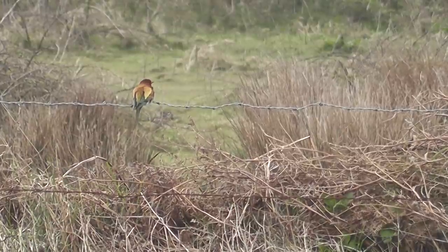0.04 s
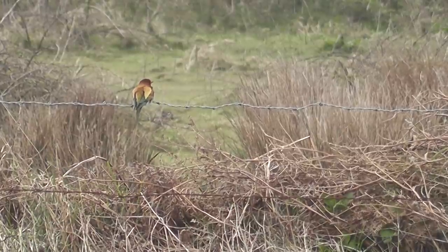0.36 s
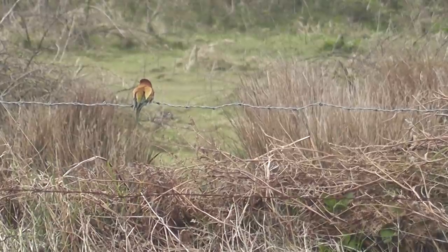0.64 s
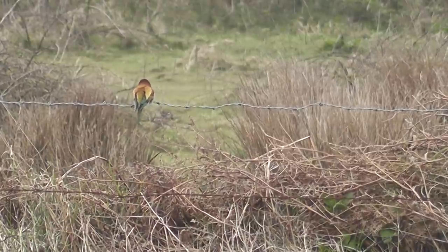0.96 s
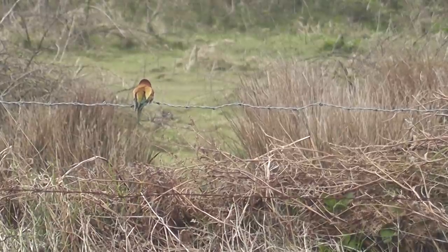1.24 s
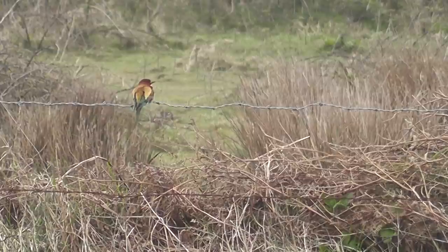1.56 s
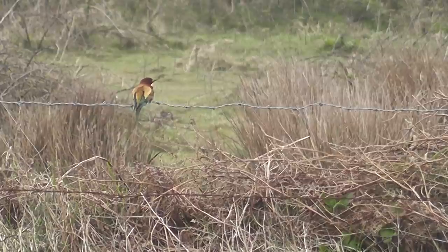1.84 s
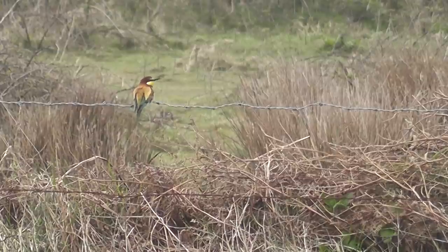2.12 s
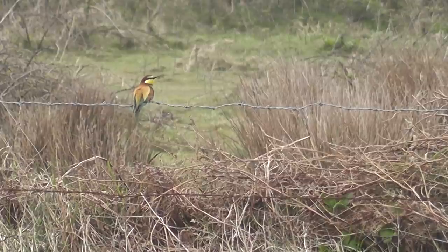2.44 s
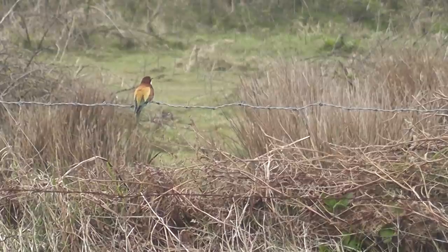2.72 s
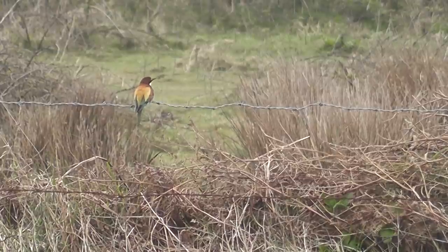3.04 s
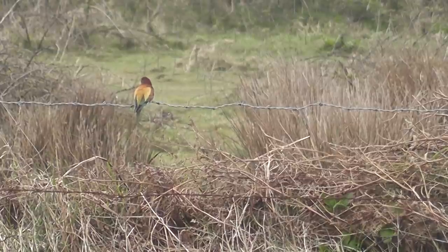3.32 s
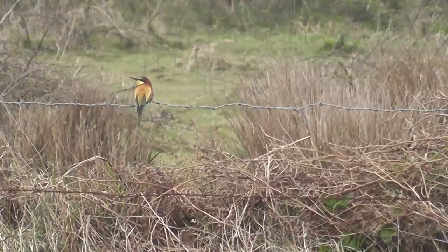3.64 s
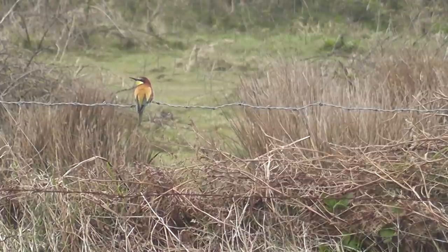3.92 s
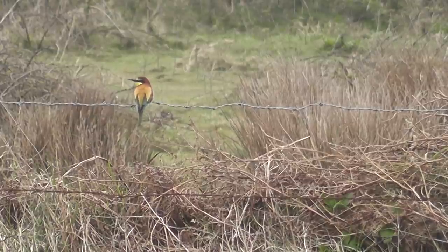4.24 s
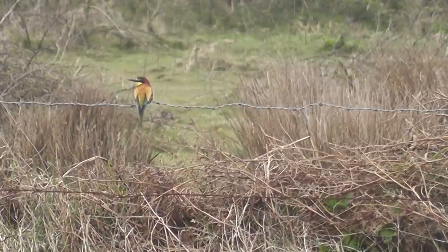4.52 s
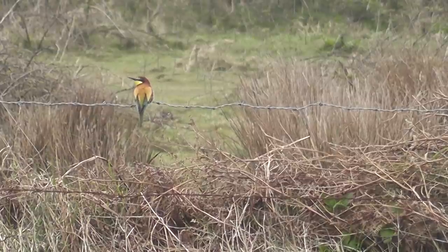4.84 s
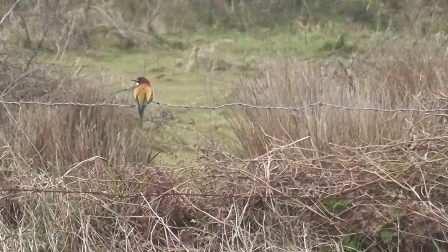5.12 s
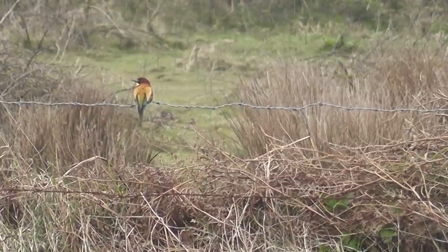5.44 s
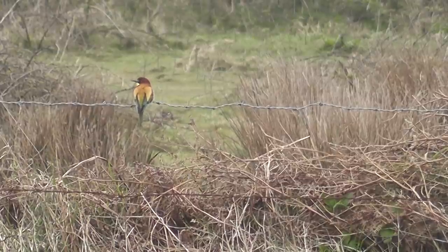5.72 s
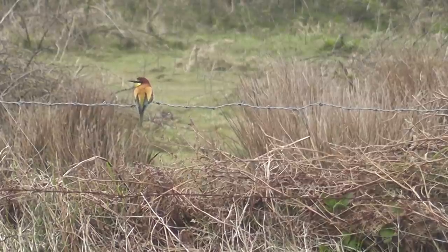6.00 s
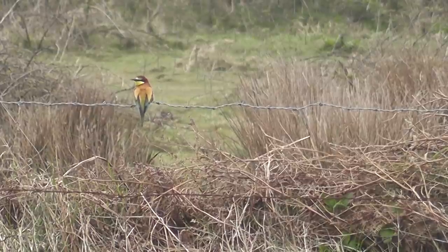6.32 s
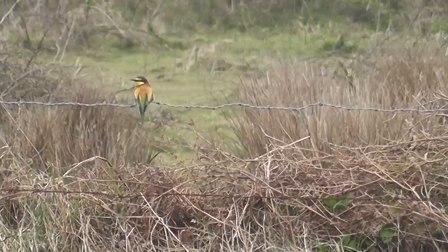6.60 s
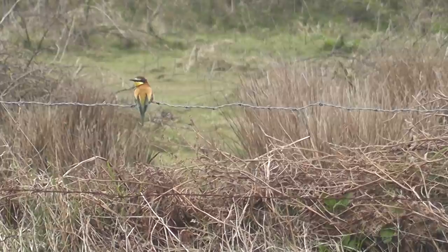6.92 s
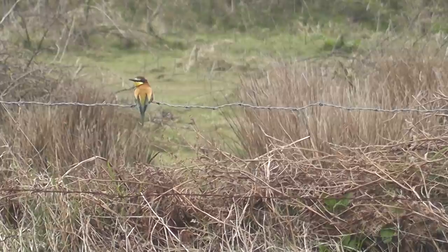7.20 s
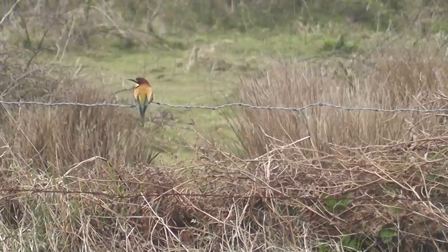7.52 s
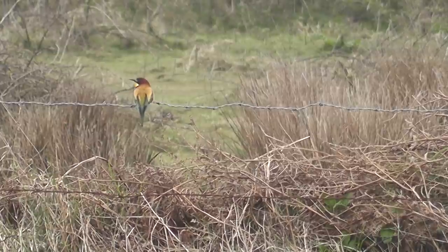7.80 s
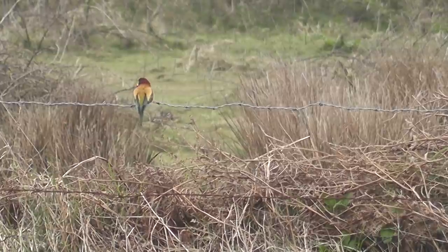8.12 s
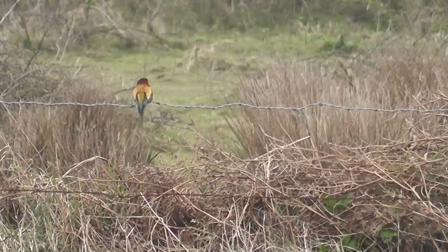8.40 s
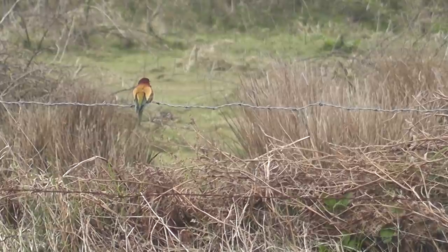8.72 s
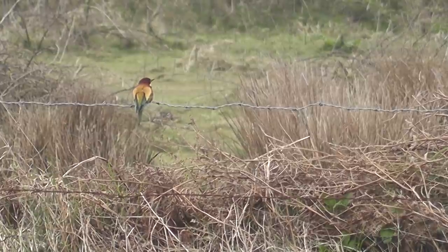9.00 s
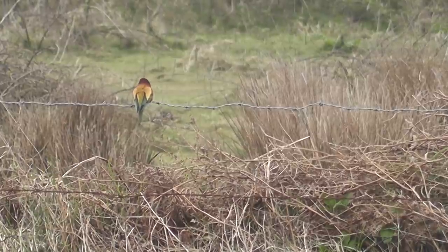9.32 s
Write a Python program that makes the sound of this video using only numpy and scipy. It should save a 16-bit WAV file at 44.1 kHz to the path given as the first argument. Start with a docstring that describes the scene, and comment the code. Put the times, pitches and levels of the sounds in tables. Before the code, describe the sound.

A small songbird sings slightly to the right in open pasture, over a soft breeze and rustling grass. It opens with a quiet whistle and five rising slurred chirps, then a very high glide and a louder whistle around 1 second. A fast, dry trill runs from 1.5 to 2 seconds, with light wind bumps on the microphone. Five loud two-part chirps follow, then a piercing whistle at 3 seconds and six quick repeated figures until 4.4. A held whistle and a falling chirp close the phrase by 5.2, while distant engines hum and the wind swells. Faint birds answer, and from 6.3 to 7 seconds come softer raspy scolds and mutters. A gust buffets the microphone with low thumps from 6.8 to 7.5. A faint distant whine swells around 8 seconds, and the song restarts at about 8.8.

```python
"""A soft whistle and a run of slurs open a small songbird's long phrase over a breezy, reedy pasture.
It goes on through a dry trill, glides and whistles, scolds and mutters softly, then starts again.
Each note is airflow vibrating the syrinx, whose tension sets the pitch; ground and reeds reflect it.
Fainter birds answer, far engines drone at their firing rate, the wind swells in the grass,
and the eddies of two gusts buffet the microphone in separate thumps."""
import sys
import numpy as np
from scipy import signal
from scipy.fft import rfft, irfft
from scipy.io import wavfile
from scipy.ndimage import uniform_filter1d

SR = 44100
rng = np.random.default_rng(int(sys.argv[2]) if len(sys.argv) > 2 else 0)


def store_pcm(level_fs):
    """Save levels as 16-bit WAV."""
    pcm = np.round(np.clip(level_fs, -1, 1) * 32767).astype(np.int16)
    wavfile.write(sys.argv[1], SR, np.atleast_2d(pcm).T)


N = 412335
TIME = np.arange(N) / SR


def gain_of(db):
    """Amplitude grows tenfold for every 20 dB."""
    return 10 ** (np.asarray(db) / 20)


def unit_rms(x):
    """Normalisation to a mean power of 1."""
    return x / np.sqrt(np.mean(x ** 2) + 1e-20)


def at_hz(points, hz):
    """Interpolation of a spectrum on a logarithmic frequency axis."""
    frequencies, values = np.transpose(points)
    return np.interp(np.log(hz + 1), np.log(frequencies + 1), values)


def swell(rows):
    """Interpolation in decibels gives an amplitude over the whole scene."""
    return gain_of(np.interp(TIME, *np.transpose(rows)))


def add(mix, start_s, sound):
    """Superposition: a sound adds to what is already there."""
    part = mix[max(round(start_s * SR), 0):][:len(sound)]
    part += sound[:len(part)]


def waver(count, hz):
    """Low-passed noise: a random fluctuation of rms near 1 and bandwidth hz."""
    size = count + SR // 4
    low_pass = np.exp(-(np.fft.rfftfreq(size, 1 / SR) / hz) ** 2)
    return unit_rms(irfft(rfft(rng.standard_normal(size)) * low_pass, size))[:count]


def contour(rows, smoothing=180):
    """A moving average rounds the corners of a path of pitch and amplitude."""
    times, hz, db = np.transpose(rows)
    t = np.arange(times[0], times[-1], 1 / SR)
    hz, db = (uniform_filter1d(np.interp(t, times, c), smoothing, mode="nearest") for c in (hz, db))
    return hz, gain_of(db) * signal.windows.tukey(len(t), min(1, smoothing / len(t)))


def tone(hz, amplitude, jitter=0.0036, flutter=0.21, second_db=-33, third_db=-46, blur=0):
    """A harmonic oscillator, randomly modulated in pitch (jitter), level (flutter) and overtone phase."""
    phase = 2 * np.pi * np.cumsum(hz * (1 + jitter * waver(len(hz), 450))) / SR
    hoarseness = blur * waver(len(hz), 900)
    overtones = sum(gain_of(db) * np.sin(k * phase + hoarseness) * (k * hz < SR / 2)
                    for k, db in [(2, second_db), (3, third_db)])
    overtones *= (hz / hz.max()) ** 2  # strongest at the top of a sweep
    tremor = 1 + flutter * waver(len(hz), 90)
    return np.sqrt(2) * amplitude * tremor * (np.sin(phase) + overtones)


# Balance of the microphone's two ports. Each row: frequency in Hz, left minus right level in dB.
PORT_BALANCE = [(100, -3), (550, -2.5), (1500, 6.5), (4000, 1.5)]

def port_noise(spectrum, coherence, left_lead, patchy_db):
    """Partial coherence: two ports share part of a noise whose spectrum drifts in patches."""
    hz = np.fft.rfftfreq(2048, 1 / SR)
    left_re, left_im, own_re, own_im, patches = rng.standard_normal((5, N // 512 + 5, len(hz)))
    patches = unit_rms(uniform_filter1d(uniform_filter1d(patches, size=9, axis=0), size=18, axis=1))
    shared = np.clip(at_hz(coherence, hz), 0, 1)
    left = left_re + 1j * left_im
    right = shared * left + np.sqrt(1 - shared ** 2) * (own_re + 1j * own_im)
    right *= np.exp(-1j * at_hz(left_lead, hz))
    side = gain_of(at_hz(PORT_BALANCE, hz) / 2)
    frames = np.array([left * side, right / side]) * gain_of(at_hz(spectrum, hz) + patchy_db * patches)
    return unit_rms(signal.istft(frames.swapaxes(1, 2), nperseg=2048, noverlap=1536)[1][:, :N])


# Spectra of still air, far wind and grass. Each row: frequency in Hz, relative density in dB.
AIR_SPECTRUM = [(20, -40), (53, 0), (81, 2.5), (408, -15.5), (996, -15.5), (2500, -29.5), (4140, -33),
                (4760, -37.5), (15800, -50)]
ROAR_SPECTRUM = [(400, -18.5), (800, 0), (1000, 4), (1300, -2), (1800, -9.5), (3000, -44.5)]
RUSTLE_SPECTRUM = [(700, -10), (1300, 5.5), (2300, 5.5), (2520, -0.5), (2750, 6), (3700, -1), (5000, -17),
                   (15000, -48.5)]
# Swells of the far wind and of the grass. Each row: time in seconds, level in dB.
ROAR_SWELLS = [(0.0, -61.5), (0.4, -56.5), (1.85, -60), (2.16, -52.5), (3.1, -51), (3.65, -59),
               (4.2, -46.5), (4.74, -52), (5.08, -48), (6.1, -56.5), (7.14, -58.5), (7.97, -50.5),
               (9.35, -57.5)]
RUSTLE_SWELLS = [(0.73, -67.5), (3.9, -61.5), (5.26, -51.5), (5.83, -60.5), (6.48, -59), (6.95, -66),
                 (8.75, -58), (9.35, -61.5)]
# Likeness of the breeze at the two ports. Each row: frequency in Hz, coherence from 0 to 1.
COHERENCE = [(60, 0.93), (250, 0.59), (600, 0.83), (4000, 1), (12000, 0.4)]
# Phase between the ports. Each row: frequency in Hz, lead of the left in radians.
LEFT_LEAD = [(60, .5), (450, 1.27), (1300, 0.74)]

def breeze(air_db=-47, rustle_gain_db=1.97):
    """Turbulence makes broadband noise: a far roar and rustling grass swell over still air."""
    air = gain_of(air_db) * port_noise(AIR_SPECTRUM, COHERENCE, LEFT_LEAD, patchy_db=1.5)
    roar = swell(ROAR_SWELLS) * port_noise(ROAR_SPECTRUM, COHERENCE, LEFT_LEAD, patchy_db=1.0)
    rustle = swell(RUSTLE_SWELLS) * port_noise(RUSTLE_SPECTRUM, COHERENCE, LEFT_LEAD, patchy_db=2.5)
    return air + roar + gain_of(rustle_gain_db) * rustle


def drone(rows, overtone_db, unsteadiness):
    """Propagation through moving air modulates the pitch and level of a far hum."""
    out = np.zeros(N)
    hz, amplitude = contour(rows)
    hz *= 1 + unsteadiness * waver(len(hz), 12)
    amplitude *= gain_of(2 * waver(len(hz), 4.58))
    add(out, rows[0][0], tone(hz, amplitude, second_db=overtone_db, third_db=2 * overtone_db))
    return out


# Two far engines. Each row: time in seconds, firing rate in Hz, level in dB.
LOW_ENGINE = [(1.5, 70.1, -57), (4, 83.6, -48), (4.7, 87.76, -41), (5.1, 90.15, -43), (5.6, 90.7, -53.5),
              (7, 89.1, -58)]
HIGH_ENGINE = [(4.8, 144.3, -68.5), (5.2, 152, -50), (5.65, 163.8, -53.5), (6.7, 130.2, -54)]
# A distant held tone. Each row: time in seconds, pitch in Hz, level in dB.
HELD_TONE = [(.22, 853, -67), (.32, 850, -55.5), (.68, 865, -60), (.85, 848, -54.5), (1.2, 854, -73)]

def far_hums():
    """Periodic firing gives each engine a harmonic hum; a higher, purer tone comes before them."""
    engines = drone(LOW_ENGINE, -14.0, 0.0073) + drone(HIGH_ENGINE, -14.5, 0.015)
    return engines + drone(HELD_TONE, -35, 0.0024)


def far_whine(peak_s=8.01, swell_s=0.52, hz=1000, width_hz=90, db=-53):
    """Narrow-band noise has a breathy pitch: a whine, perhaps of far tyres, swells on the left."""
    band = ((waver(N, width_hz) + 1j * waver(N, width_hz)) * np.exp(2j * np.pi * hz * TIME)).real
    side = gain_of(at_hz(PORT_BALANCE, hz) / 2)
    amplitude = gain_of(db) * np.exp(-((TIME - peak_s) / swell_s) ** 2)
    return np.array([[side], [1 / side]]) * amplitude * band


# Puffs of wind on the microphone. Each row: time of the peak in seconds, level in dB.
PUFFS = [(1.398, -37), (1.588, -31.5), (1.678, -29.5), (1.709, -28), (1.897, -34), (2.295, -37),
         (6.795, -36), (6.88, -21.5), (6.917, -17.5), (6.968, -19), (7.01, -24.5), (7.05, -23),
         (7.118, -19), (7.198, -20.5), (7.279, -18), (7.324, -18.5), (7.383, -17.5), (7.432, -18.5),
         (7.457, -19), (7.52, -36), (7.583, -32), (7.845, -38)]
# Spectrum of their eddies. Each row: frequency in Hz, relative density in dB.
EDDY_SPECTRUM = [(20, -31), (110, 1), (183, -1.5), (340, -16), (793, -36.5), (1100, -52), (4000, -105)]

def buffets(rise_s=.018, fall_s=0.03, dull_hz=170, bright_db=-21, brightening=0.71):
    """Eddy pressure thumps both sides of the microphone almost equally; weak puffs are duller."""
    puffs = (gain_of(db) * np.exp(-((TIME - s) / np.where(TIME < s, rise_s, fall_s)) ** 2)
             for s, db in PUFFS)
    strength = np.sqrt(sum(puff ** 2 for puff in puffs))
    eddies = port_noise(EDDY_SPECTRUM, [(100, .72)], left_lead=[(80, .3), (300, 1.7)], patchy_db=1)
    low = signal.filtfilt(*signal.butter(2, dull_hz, fs=SR), eddies)
    brightness = np.minimum(strength / gain_of(bright_db), 1) ** brightening
    eddies = low + (eddies - low) * brightness
    eddies /= np.sqrt(uniform_filter1d((eddies ** 2).mean(0), size=1300))  # the puffs alone set the level
    return gain_of([[1], [-1]]) * strength * eddies


def reeds(dry, wet_db, ground_db, t60=0.13, width=0.66, scatter_hz=4600):
    """Reflection and scattering: the ground returns two echoes, thin stems throw back mostly treble."""
    t = np.arange(SR // 2) / SR
    scatter = rng.choice([-1., 1.], (3, len(t))) * (rng.random((3, len(t))) < 3000 / SR)
    scatter *= gain_of(-60 * t / t60) * (t > .003)
    scatter /= np.linalg.norm(scatter, axis=1, keepdims=True)
    scatter = signal.lfilter(*signal.butter(2, scatter_hz, "high", fs=SR), scatter)
    response = gain_of(wet_db) * (scatter[2] + width * scatter[:2])
    response[:, 0] = 1  # the direct path
    for delay_s, share in [(.0042, 1), (.00685, .5)]:
        response[:, round(delay_s * SR)] += share * gain_of(ground_db)
    return signal.fftconvolve(dry[None], response, axes=1)[:, :N]


def snap(start_s=4.5215, db=-42):
    """A brief impulse has a broad spectrum: one dry tick in the undergrowth."""
    out = np.zeros(N)
    crack = signal.lfilter(*signal.butter(1, [2000, 8000], "band", fs=SR), rng.standard_normal(120))
    add(out, start_s, gain_of(db) * unit_rms(crack) * np.linspace(1, 0, len(crack)))
    return out


def envelope(t, attack, release):
    """Sine-squared ramps start and stop a note without a click."""
    rise = np.clip(t / attack, 0, 1)
    fall = np.clip((t[-1] - t) / release, 0, 1)
    return (np.sin(np.pi / 2 * rise) * np.sin(np.pi / 2 * fall)) ** 2


# Gestures of the syrinx, by kind. Each row: attack in seconds, release in seconds, starting pitch in Hz,
# then turning points as pairs of time in seconds and pitch in Hz.
CHIRP_SHAPES = { "slur": (0.019, 0.021, 4700, [(.036, 6190), (.064, 5650), (.093, 6470)]),
                "wave": (0.018, 0.025, 5100, [(.02, 7850), (.044, 6960), (.066, 7840), (.092, 7310)]),
                "sway": (0.039, 0.035, 7930, [(.03, 7190), (.07, 7640), (.13, 6500)]),
                "lead": (0.043, 0.01, 3885, [(.058, 4254)]), "whip": (.017, .03, 4300, [(.008, 5720),
                (.018, 5610), (.037, 4200), (.059, 3420)]), "swoop": (0.012, 0.076, 4800, [(.012, 6280),
                (.036, 4750), (.062, 3900), (.1, 3300)]), "bow": (0.023, 0.027, 3700, [(.009, 5250),
                (.025, 5360), (.058, 3220)]), "hook": (0.018, 0.005, 3420, [(.023, 4570)]),
                "peak": (0.0034, .014, 6060, [(.01, 5790), (.023, 8140), (.048, 6700), (.078, 6120)]),
                "tick": (.004, 0.0022, 3500, [(.0035, 4600), (.006, 3100), (.013, 4300)]),
                "stroke": (0.0076, 0.0023, 7600, [(.0035, 5500), (.0075, 3700)]),
                "scold": (0.0089, 0.0061, 3705, [(.009, 4260), (.022, 2700)]),
                "chip": (0.0096, 0.0095, 4490, [(.01, 5530), (.016, 4920), (.022, 3000)]),
                "tent": (0.046, 0.012, 4690, [(.02, 5070), (.033, 7400), (.046, 4200), (.075, 4000),
                (.098, 3270)]), "arch": (0.021, 0.01, 3840, [(.025, 5330), (.058, 5450)]), }

def chirp(kind, stretch=1, rounding=.16):
    """Frequency modulation: one chirp's pitch path, rounded over a share of its length, and envelope."""
    attack, release, start_hz, turns = CHIRP_SHAPES[kind]
    times, hz = np.transpose([(0, start_hz), *turns])
    t = np.arange(0, times[-1], 1 / (SR * stretch))
    hz = uniform_filter1d(np.interp(t, times, hz), max(1, int(rounding * len(t))), mode="nearest")
    return hz, envelope(t, attack, release)


def sing(rows, wander=.008, **voice):
    """The syrinx oscillates in chirps; random drift of the pitch makes each one unique."""
    out = np.zeros(N)
    for start_s, kind, db, pitch, stretch in rows:
        hz, amplitude = chirp(kind, stretch)
        hz = hz * pitch * (1 + wander * waver(len(hz), 40))
        add(out, start_s, gain_of(db) * tone(hz, amplitude, **voice))
    return out


def repeat(kind, start_s, period_s, slowing_s, first_db, last_db, swell_db, count, pitch=1, stretch=1):
    """Near-periodic repetition: rows of chirps whose gaps grow by slowing_s as the level arches."""
    return [(start_s + k * period_s + slowing_s * k * (k - 1) / 2, kind,
             first_db + (last_db - first_db) * u + swell_db * np.sin(np.pi * u), pitch, stretch)
            for k, u in enumerate(np.linspace(0, 1, count))]


def whistle(start_s, length, db, start_hz, held_hz, settle_s, attack=.012, release=0.02, flutter=0.083):
    """Exponential relaxation: a clean note slides towards its held pitch, then sags as it ends."""
    out, t = np.zeros(N), np.arange(0, length, 1 / SR)
    sag_hz = 400 * np.exp((t - length) / .018)
    hz = held_hz + (start_hz - held_hz) * np.exp(-t / settle_s) - sag_hz
    note = tone(hz, envelope(t, attack, release), jitter=0.0025, flutter=flutter, second_db=-36, blur=.35)
    add(out, start_s, gain_of(db) * note)
    return out


def rattle():
    """A pulse train: a far bird's thin, evenly spaced ticks fade as they go."""
    ticks = repeat("tick", start_s=7.51, period_s=.0228, slowing_s=0, first_db=-59, last_db=-64,
                   swell_db=0, count=11, pitch=1.8, stretch=0.67)
    return sing(ticks, jitter=0.12)


# Far birds' chirps. Each row: start in seconds, kind, level in dB, pitch factor, length factor.
ANSWER_CHIRPS = [(6.05, "hook", -62, 0.92, 2.1), (6.128, "arch", -62, 0.99, 1),
                 (6.21, "arch", -60, 1.02, 0.74), (6.82, "arch", -47, 0.8, 0.99),
                 (7.325, "arch", -56, .89, 0.61), (7.365, "arch", -53.5, 0.75, 0.6)]
# Their whistles. Each row: start and length in seconds, level in dB, starting and held pitch in Hz.
ANSWER_WHISTLES = [(1.367, .085, -56, 5450, 4740), (5.395, .042, -65, 7000, 5300),
                   (6.083, .045, -58.5, 5270, 4100), (6.383, 0.037, -52, 7500, 6500),
                   (7.214, 0.043, -56, 6930, 4800), (7.52, 0.036, -57, 5600, 4750),
                   (8.624, 0.14, -66, 7030, 5350)]

def far_birds():
    """Moving air makes the amplitude of distant calls fluctuate."""
    notes = sum(whistle(start_s, length, db, start_hz, held_hz, settle_s=.55 * length, flutter=0.3)
                for start_s, length, db, start_hz, held_hz in ANSWER_WHISTLES)
    return sing(ANSWER_CHIRPS, jitter=.008, flutter=.3) + notes + rattle()


# Muttered notes. Each row: start in seconds, kind, level in dB, pitch factor, length factor.
CHATTER_NOTES = [(6.74, "hook", -45, 1.23, 0.78), (6.752, "chip", -42.5, 0.97, 0.92),
                 (6.768, "chip", -39.5, 0.96, 0.99), (6.791, "chip", -44, 0.92, 0.73),
                 (6.801, "hook", -45, 1.04, .65), (6.878, "chip", -36.5, 1.02, 1.05),
                 (6.905, "chip", -42.5, 0.96, 1), (6.931, "chip", -43.5, 0.97, 0.94)]

def chatter(upper_db=-4, upper_pitch=1.11, upper_stretch=.42):
    """Biphonation: one side of the syrinx mutters while the other adds a rough note above each chip."""
    upper = [(start_s, "arch", db + upper_db, upper_pitch, upper_stretch * stretch)
             for start_s, kind, db, _, stretch in CHATTER_NOTES if kind == "chip"]
    lower_voice = sing(CHATTER_NOTES, jitter=0.019, flutter=0.32, second_db=-19, blur=2.4)
    return lower_voice + sing(upper, jitter=0.036, flutter=0.37, second_db=-32)


# Harsh notes. Each row: start in seconds, level in dB, then factors for roughness, pitch and length.
SCOLD_NOTES = [(6.264, -49.5, 1, .85, 1.24), (6.291, -43, 0.9, 0.83, 0.98), (6.309, -44, 1.2, 0.87, 0.97),
               (6.326, -42, 0.92, 0.9, 0.94), (6.35, -44, 1.2, 0.88, 1), (6.363, -45, 0.9, .9, 1.1),
               (6.437, -42.5, 0.5, .96, 1.1), (6.494, -40, 0.9, .9, .9), (6.552, -43, 0.8, 0.94, .9),
               (6.619, -42.5, 0.54, 1.03, 1.45), (6.674, -47, 0.6, 0.97, .85)]

def scold(rasp_db=-4.0, note_db=-3.5, fizz_db=-16, rasp_stretch=1.4, breakup=.085, crackle_db=4):
    """Aperiodic vibration: notes with a strong second harmonic break up as they fall, ending in a rasp."""
    out = np.zeros(N)
    rasp_band = signal.butter(2, [5000, 7300], "band", fs=SR)
    for start_s, db, roughness, pitch, stretch in SCOLD_NOTES:
        hz, amplitude = chirp("scold", stretch)
        disorder = roughness * np.linspace(0, 1, len(hz))
        note = tone(hz * pitch, amplitude, jitter=breakup * disorder,
                    second_db=0, third_db=-21, blur=1.3 * disorder)
        add(out, start_s, gain_of(db + note_db) * np.sqrt(1 - roughness / 2) * note)
        _, amplitude = chirp("scold", stretch * rasp_stretch)
        count = len(amplitude)
        crackle = unit_rms(rng.standard_normal(count) * gain_of(crackle_db * waver(count, 500)))
        rasp = unit_rms(signal.lfilter(*rasp_band, crackle)) + gain_of(fizz_db) * crackle
        add(out, start_s, gain_of(db + rasp_db) * roughness * amplitude * rasp)
    return out


def trill(start_s=1.4724, period_s=.04846, slowing_s=.00032, lead_s=.0223, strong_db=-35, weak_db=-39):
    """Very fast down-sweeps are heard as dry clicks; they come in pairs, weak then strong."""
    strokes = (repeat("stroke", first_s, period_s, slowing_s, db, db, swell_db=1.0, count=12)
               for first_s, db in [(start_s, strong_db), (start_s - lead_s, weak_db)])
    return sum(sing(rows, jitter=0.025, flutter=0.079, second_db=-21.5, third_db=-23, blur=2.4)
               for rows in strokes)


# The singer's whistles. Each row: start and length in seconds, level in dB, starting and held pitch
# in Hz, then settling time, attack and release in seconds.
SONG_WHISTLES = [(0.022, 0.096, -49, 5060, 4130, 0.053, .03, 0.048),
                 (1.154, .16, -33, 6450, 5077, .025, 0.018, 0.061),
                 (4.593, 0.24, -31, 4800, 6884, 0.025, 0.018, 0.017),
                 (6.93, 0.16, -52, 5560, 5030, .2, .015, .025),
                 (9.094, 0.085, -33.5, 5090, 4170, 0.062, 0.036, .045)]
# Brief dips and swells in them. Each row: time in seconds, change of level in dB.
WHISTLE_FALTERS = [(1.222, -11), (1.256, 5.5), (4.81, -6)]

def whistles(falter_s=0.0088):
    """Amplitude modulation: the clean whistles briefly falter or swell."""
    change_db = sum(db * np.exp(-((TIME - s) / falter_s) ** 2) for s, db in WHISTLE_FALTERS)
    return gain_of(change_db) * sum(whistle(*row) for row in SONG_WHISTLES)


# Two long glides, one list apiece. Each row: time in seconds, pitch in Hz, level in dB.
GLIDE_PATHS = [
    [(.941, 4450, -52), (.957, 7450, -34), (.984, 7640, -32), (.998, 8030, -36.5), (1.035, 8030, -36),
     (1.07, 8240, -55), (1.1, 8150, -45), (1.125, 8030, -55)],
    [(2.958, 6440, -43), (2.972, 7710, -30.5), (3.02, 6700, -23.5), (3.034, 6814, -26), (3.049, 6782, -46),
     (3.062, 6705, -23), (3.1, 6705, -23), (3.174, 6460, -35.5), (3.182, 6460, -54)],
]

def glides():
    """Sustained oscillation: nearly pure tones glide at the top of the song, each with a break in it."""
    out = np.zeros(N)
    for path in GLIDE_PATHS:
        add(out, path[0][0], tone(*contour(path), jitter=.0015, flutter=.07, second_db=-39, blur=.5))
    return out


# Runs of one chirp. Each row: kind, then start, period and slowing per repeat in seconds, first level,
# last level and middle swell in dB, number of chirps, relative level of the second harmonic in dB.
SONG_RUNS = [("slur", 0.13, 0.1606, 0, -47, -37, -0.44, 5, -30.5),
             ("tick", .2475, .1603, 0, -57, -44.5, 2, 5, -35),
             ("lead", 2.177, 0.1503, 0, -32, -30.5, .5, 5, -40),
             ("whip", 2.249, 0.1495, 0, -29.5, -28, 0.45, 5, -39),
             ("bow", 3.22, 0.2055, 0.0038, -29.7, -32, 0.56, 6, -38.5),
             ("hook", 3.277, .205, 0.0036, -34, -35, 1.43, 6, -35),
             ("peak", 3.306, 0.205, .004, -36, -38, 2.6, 6, -35.5),
             ("tent", 5.505, .166, 0, -58, -61, 0, 3, -30)]
# Single chirps. Each row: start in seconds, kind, level in dB, pitch factor, length factor.
SONG_CHIRPS = [(1.357, "wave", -30.5, 0.95, 0.8), (1.422, "stroke", -38, 1.18, 0.93),
               (2.06, "wave", -33.5, 1, 0.96), (4.523, "scold", -49.5, .82, 1.2),
               (4.884, "lead", -31.5, 1.137, 1.03), (4.963, "swoop", -33, 1.017, 1.04),
               (5.1, "lead", -42.5, 1.1, 0.97), (8.805, "whip", -50.5, 0.99, 0.91),
               (8.86, "hook", -53.5, .95, 1), (8.942, "sway", -42, 1, 0.97),
               (9.205, "slur", -38.5, 1, 0.93), (9.3105, "tick", -45.5, 1.05, 1.1)]

def chirps():
    """Frequency sweeps with weak harmonics, in runs and singly, carry the phrase."""
    runs = sum(sing(repeat(*run), jitter=.004, flutter=.14, second_db=second_db, third_db=-44, blur=.4)
               for *run, second_db in SONG_RUNS)
    return runs + sing(SONG_CHIRPS, jitter=0.0047, flutter=0.15, second_db=-35.5, blur=0.4)


def scene():
    """The sources superpose; a level difference places the birds a little to the right."""
    swept = chirps()
    held = whistles() + glides()
    birds = reeds(swept + snap(), wet_db=-6.0, ground_db=-11)
    birds += reeds(held, wet_db=-9.5, ground_db=-12)
    birds += reeds(trill(), wet_db=-4, ground_db=-8.5)
    birds += reeds(scold() + chatter(), wet_db=-7.5, ground_db=-8.5)
    birds += reeds(far_birds(), wet_db=-13, ground_db=-17)
    return birds * gain_of([[-1.3], [1.0]]) + far_hums() + far_whine() + breeze() + buffets()


def record(dry, low_cut_hz=36, band_limit_hz=15950):
    """Band limiting: the microphone cuts the deepest bass and the recorder the highest treble."""
    thinned = signal.lfilter(*signal.butter(2, low_cut_hz, "high", fs=SR), dry)
    low_pass = signal.firwin(511, band_limit_hz, window=("kaiser", 9), fs=SR)
    return signal.oaconvolve(thinned, low_pass[None], "same")


dry = scene()
out = record(dry)
store_pcm(out)
```